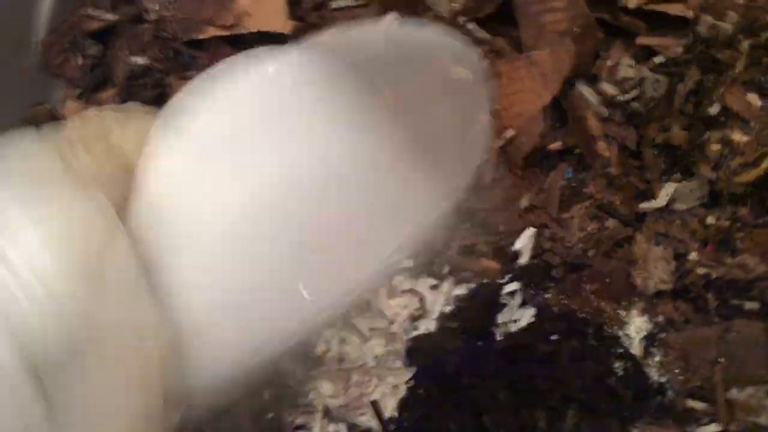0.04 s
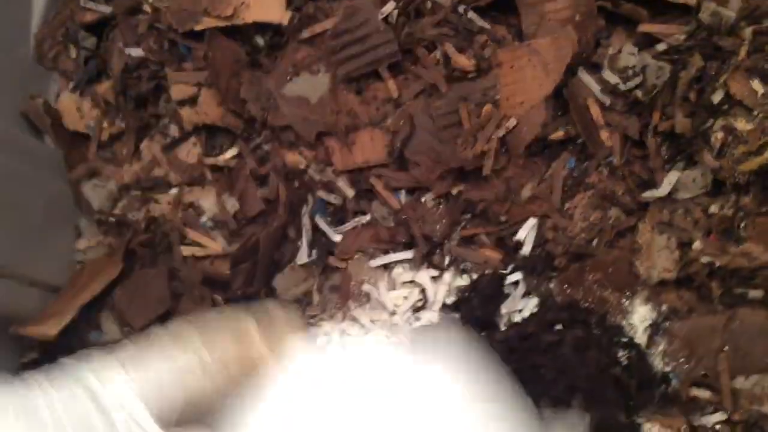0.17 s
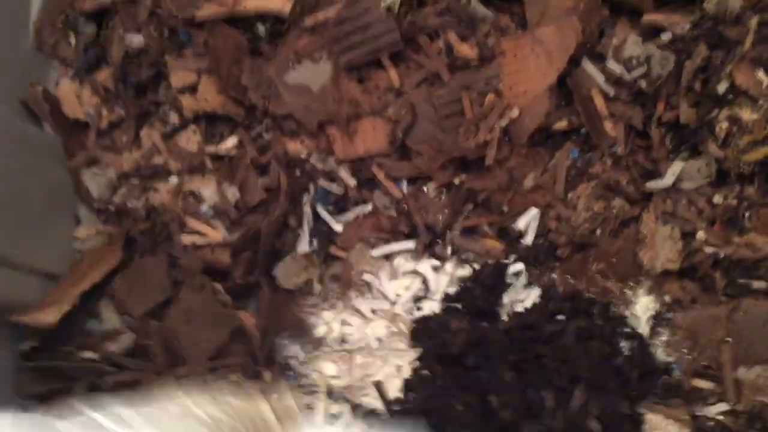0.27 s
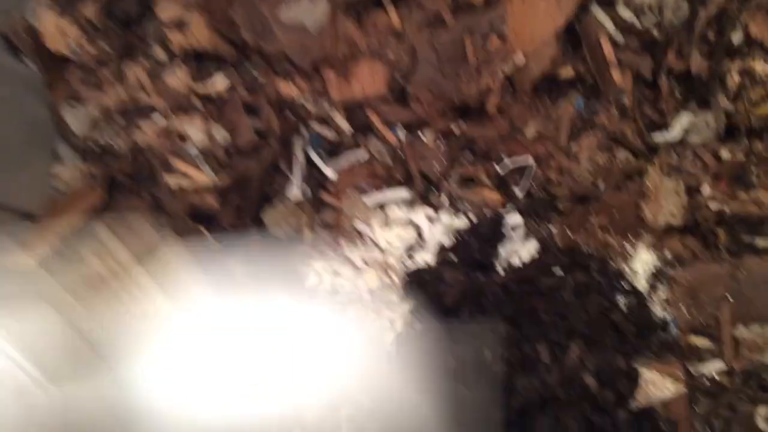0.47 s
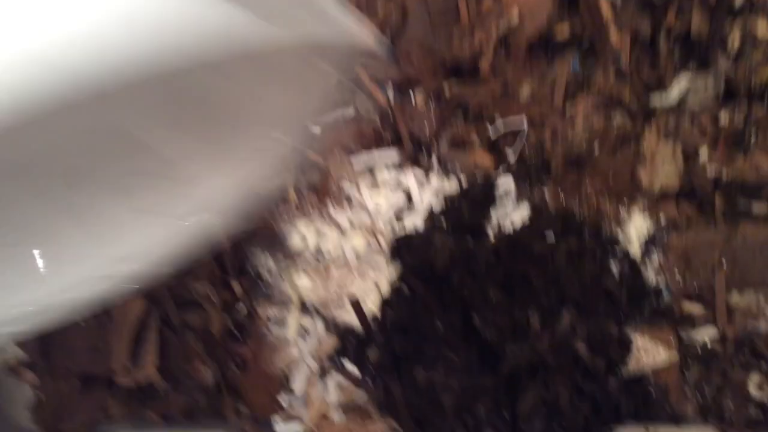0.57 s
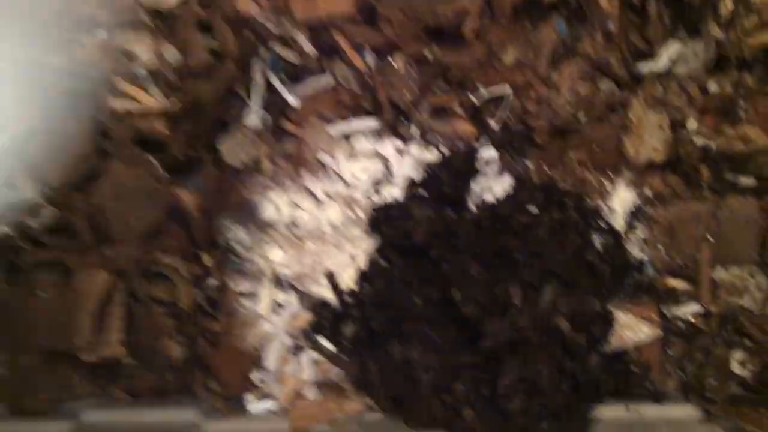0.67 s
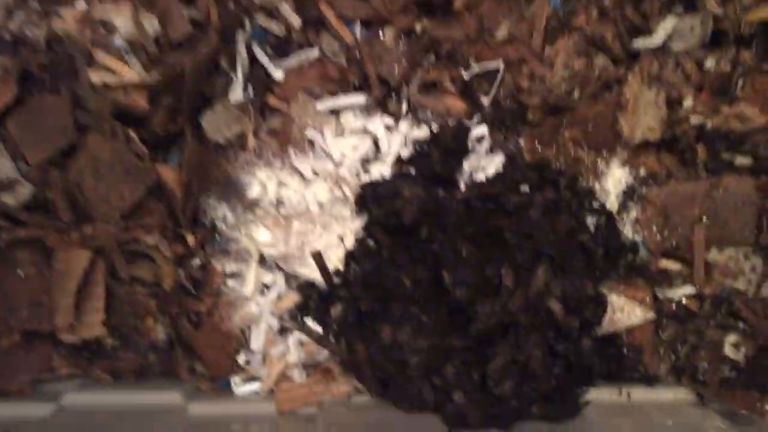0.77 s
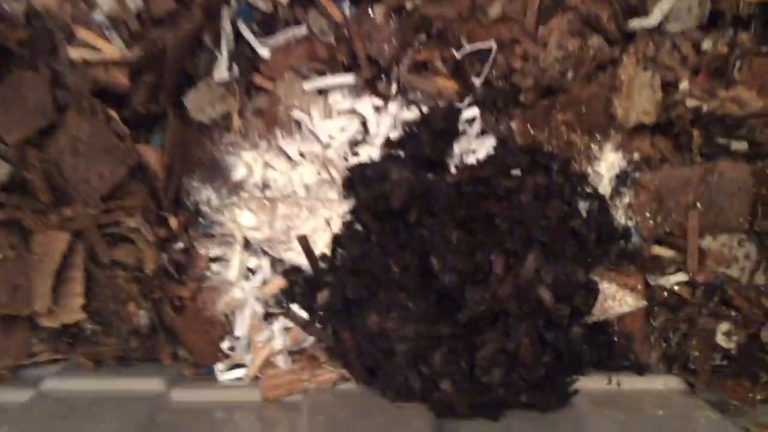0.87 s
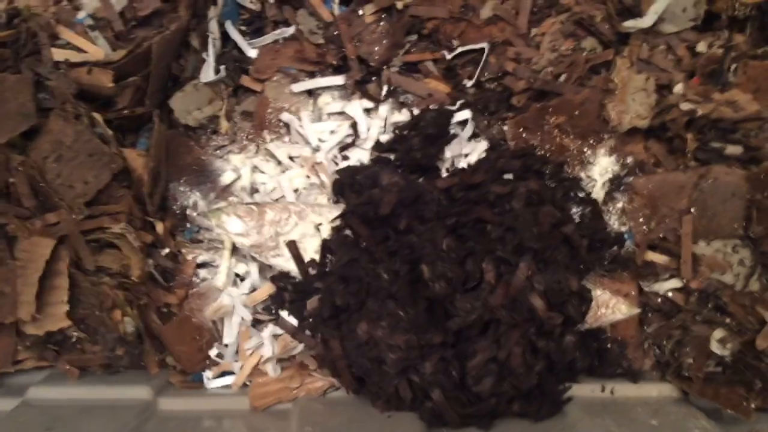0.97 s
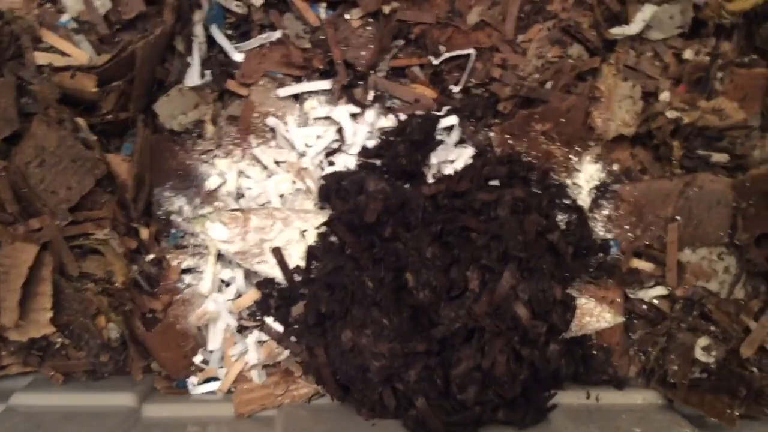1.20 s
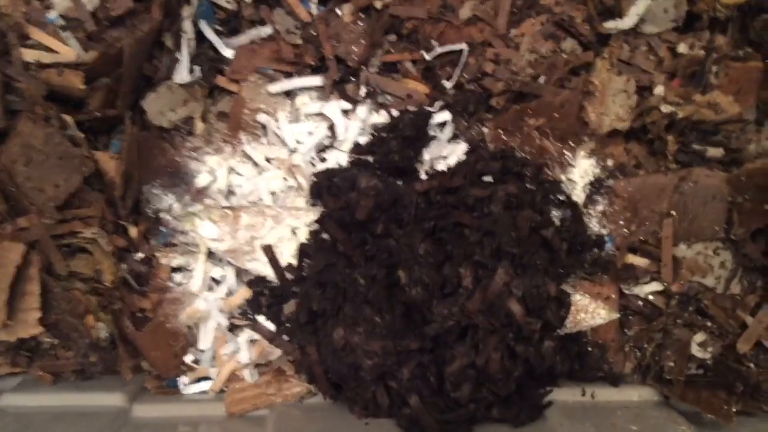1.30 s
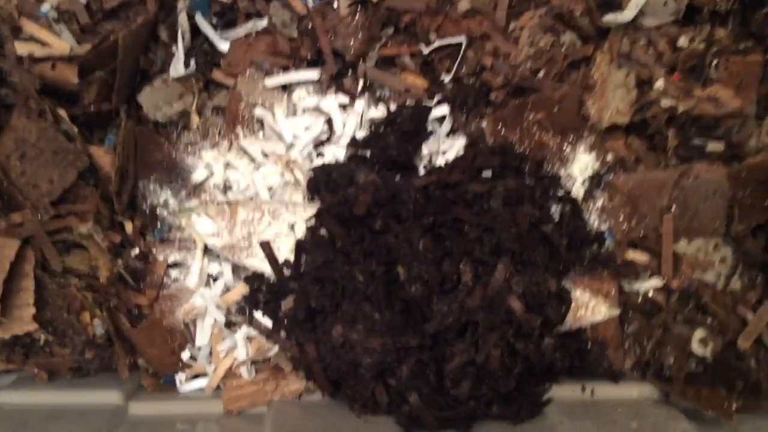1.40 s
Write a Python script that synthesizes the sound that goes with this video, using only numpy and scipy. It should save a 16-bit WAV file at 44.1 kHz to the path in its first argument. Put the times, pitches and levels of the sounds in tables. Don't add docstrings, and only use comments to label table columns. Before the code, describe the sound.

A stiff plastic bowl bangs three times against a hollow bin, then is put down with a bounce

```python
import sys
import numpy as np
from scipy import signal
from scipy.fft import rfft, irfft
from scipy.io import wavfile
from scipy.ndimage import uniform_filter1d

SR = 44100
rng = np.random.default_rng(int(sys.argv[2]) if len(sys.argv) > 2 else 0)


def pcm_store(signal):
    levels = np.round(np.clip(np.atleast_2d(signal), -1, 1) * 32767)
    wavfile.write(sys.argv[1], SR, levels.astype(np.int16).T)


def ratio(d):
    e = np.asarray(d, float) / 20
    return 10 ** e


N = 63945
T = np.arange(N) / SR

# f/Hz, density level/dB
HUSH_SPECTRUM = [(15, -41.5), (25, -14.5), (146, -6.5), (231, -17.5), (720, -25), (970, -24), (1710, -30.5),
                 (9200, -34), (16200, -49.5)]
# t/s, length/s, level/dB, centre f/Hz
RUBS = [(0.0982, 0.02, -55, 6000), (0.116, 0.041, -58, 4100), (0.133, 0.012, -53, 6000),
        (0.179, 0.014, -53, 5750), (0.32, 0.14, -56.5, 4070), (.69, 0.1, -60.5, 8060),
        (0.793, .014, -59, 3500), (.820, 0.015, -51.5, 8450), (0.807, 0.025, -54.5, 3670),
        (0.834, 0.12, -70.5, 5950), (1.232, 0.054, -58, 11000)]
# f/Hz, t60/s, level/dB
ROOM_BANDS = [(129.6, 0.28, -18.5), (294, 0.33, -18.5), (696, 0.44, -20), (1530, .4, -17.5),
              (3500, 0.32, -15.5), (7340, 0.37, -18), (11000, .2, -17.5)]
# end t/s, length/s, low tone level/dB, hiss level/dB
LEADS = [
    (0.2095, .022, -10, -22),
    (0.371, 0.036, -42.5, -42),
    (0.505, 0.026, -29.5, -39.5),
    (1.098, 0.0078, -35, -45),
]
# t/s, crack level/dB, blow level/dB, contact/ms, crack tilt/(dB per octave)
BLOWS = [
    (0.2047, -6.5, 0, 1.6, 0.7),
    (0.2124, -15.5, -12.5, 3.3, -6),
    (.3660, -16.5, -1, 1.37, -1.25),
    (.5030, -12.5, -.5, 1.7, -1.7),
    (0.5182, -25.5, -23, 0.89, -0.9),
]
BLOW_SPOT = [0, 0, 1, 2, 2]
# f/Hz, density level/dB
CRACK_SPECTRUM = [(500, -24.5), (1100, -8.5), (2180, -6.5), (2680, -8), (5340, -4), (6480, -7),
                  (12200, -10.5), (16200, -20.5)]
# f/Hz, width/Hz, level/dB at the first, second and third spot
SHELL_MODES = [(1390, 82, -14, 7, -1), (2056, 310, 7, -19, -7), (3400, 160, -3, 8, 13.5),
               (4140, 320, 4.5, -3, -17), (5290, 2100, -3, -4, -18.5), (7835, 500, -5, 9.5, 5.5),
               (9440, 600, -7, 13.5, -5.5)]
# f/Hz, t60/s, level/dB at the first, second and third spot
WALL_MODES = [(57.4, .2, -24, -22.5, -19), (92.4, 0.16, -2.5, -7, -7.5), (116.6, 0.13, -9, -14.5, -19),
              (132.34, 0.37, -22, -24.5, -18.5), (157.4, 0.15, -6.5, -15, -9),
              (164.1, 0.34, -9.5, -21.5, -14.5), (192.5, .22, -17.5, -33, -10.5),
              (222.2, 0.1, -7, -9.5, -9.5), (276.7, 0.12, -7, -11.5, -7), (352.5, .06, -12.5, -19, -18.5),
              (471.8, 0.17, -12.5, -34.5, -19), (729, 0.072, -11.5, -22, -26.5)]
WALL_SIGN = [-1, 1, 1, 1, 1, 1, 1, -1, 1, -1, 1, -1]
# f/Hz, t60/s, level/dB at the first, second and third spot
CLONK_MODES = [(849.3, 0.098, -4.5, 0, 0), (831.7, 0.17, -20.5, -10.5, -6.5), (855, .055, -13, -5.5, -11),
               (852, .35, -36.5, -25.5, -26.5), (1200, 0.033, -21, -5, -28)]
# t/s, f/Hz, level/dB, t60/s
TOUCHES = [
    (.5035, 3150, -20, .045),
    (.5190, 5500, -30, .02),
    (.8190, 3110, -58, .06),
    (.2065, 4180, -16, .035),
]
# t/s, crack level/dB, thump level/dB, contact/ms, crack tilt/(dB per octave)
LANDINGS = [
    (1.1012, -26, -47, 6.3, 0.8),
    (1.103, -26.5, -8.5, 1.9, 1.7),
    (1.1250, -40, -21.5, 1.7, -10.5),
    (1.1458, -27, -24.5, 2.1, 2),
    (1.168, -38, -21, 0.75, 1.5),
    (1.182, -43.5, -33, 0.7, 0),
]
# f/Hz, density level/dB
CLATTER_SPECTRUM = [(290, -30), (500, -4), (650, -2), (1180, 3.5), (1650, -11.5), (3470, -12.5),
                    (6210, -14.5), (9480, -17.5), (16200, -37)]
# f/Hz, level/dB, t60/s
TOP_MODES = [(79.7, -27, 0.34), (127.6, -21, 0.17), (175.3, -6.5, 0.18), (193, -2.5, 0.064),
             (227.5, -11.5, 0.11), (306.4, -26, 0.37), (395.4, -8.5, 0.075), (465.4, -18.5, 0.27),
             (595, -19, 0.067), (750, -15.5, 0.19), (842, -10, .2)]
TOP_SIGN = [-1, 1, 1, 1, -1, 1, -1, 1, -1, 1, -1]
# f/Hz, width/Hz, level/dB
BOWL_MODES = [(1185, 25, 0.5), (1217, 44, 9.5), (2393, 28.6, 21), (3166, 65, 15), (3430, 77, 20),
              (4060, 75, 15), (4426, 77, 17), (8220, 670, 5)]


def unit(x):
    return x / np.sqrt(np.mean(x ** 2))


def noise():
    return rng.standard_normal(N)


def shaped(x, points, tilt_db=0.):
    f = np.maximum(np.fft.rfftfreq(len(x), 1 / SR), 10)
    hz, db = np.array(points).T
    gain_db = np.interp(np.log(f), np.log(hz), db) + tilt_db * np.log2(f / 4000)
    return irfft(rfft(x) * ratio(gain_db), len(x))


def band(x, hz, width):
    return signal.lfilter(*signal.iirpeak(min(hz, .45 * SR), hz / width, fs=SR), x)


def band_twice(x, hz, width):
    return unit(band(band(x, hz, width), hz, width))


def ring(x, hz, t60):
    pole = np.exp(2j * np.pi * hz / SR - np.log(1000) / (t60 * SR))
    return signal.lfilter([1], [1, -pole], x).imag


def decay(at, t60):
    u = np.maximum(T - at, 0)
    return (1 - np.exp(-u / 0.00065)) * ratio(-60 * u / t60)


def push(at, ms):
    u = np.maximum(T - at, 0) / (ms / 4000)
    force = u * np.exp(-u)
    return force / force.sum()


def floor():
    hush = ratio(-60) * unit(shaped(noise(), HUSH_SPECTRUM))
    rumble_db = 5 * np.clip(1 - T / .9, 0, 1)
    return hush + band(hush, 112, 130) * (ratio(rumble_db) - 1)


def rustles():
    grains_per_s, spread_db = 2500, 3.5
    chance = rng.random((3, N))
    happens = chance[0] < grains_per_s / SR
    size = ratio(-spread_db * np.log(chance[1] + 1e-9))
    grains = unit(happens * size * np.sign(chance[2] - .5)) + .6 * noise()
    out = 0
    for at, length, db, hz in RUBS:
        swell = np.sin(np.pi * np.clip((T - at) / length, 0, 1) ** .6) ** 0.62
        out = out + ratio(db) * swell * band_twice(grains, hz, 1.2 * hz)
    return out


def room(x):
    gap_s, diffuse_hz, blur_share, air_hz = 0.006, 1000, 0.82, 11500
    u = np.maximum(T[:SR // 2] - gap_s, 0)
    echoes, hiss = 0, 0
    for hz, t60, db in ROOM_BANDS:
        air = band_twice(noise(), hz, hz)
        fade = (u > 0) * ratio(-60 * u / t60)
        fade = ratio(db) * 0.42 * fade / np.sqrt(np.sum(fade ** 2))
        blur = blur_share * (hz > diffuse_hz)
        echoes = echoes + air[-len(u):] * fade * np.sqrt(1 - blur)
        stored = np.abs(signal.fftconvolve(band(x, hz, hz) ** 2, fade ** 2)[:N])
        hiss = hiss + air * np.sqrt(blur * stored) * 1.5
    air_loss = signal.butter(3, air_hz, fs=SR, output="sos")
    return signal.sosfilt(air_loss, signal.fftconvolve(x, echoes)[:N] + hiss)


def lead_ins():
    low_tone = band_twice(noise(), 204, 200)
    hiss = unit(shaped(noise(), CRACK_SPECTRUM))
    out = 0
    for at, length, low_db, hiss_db in LEADS:
        leading = (T > at - length) * (T < at)
        swell = ratio(37 * np.minimum(T - at, 0) / length)
        out = out + (ratio(low_db) * low_tone + ratio(hiss_db) * hiss) * leading * swell
    return out


def crack(at, db, tilt_db, colour):
    tick_db, tick_t60, burst_t60, rattle_db, rattle_t60 = 2, 0.0058, 0.026, -13, 0.054
    grit = ratio(2.9 * 3.9 * uniform_filter1d(noise(), size=30))
    burst = unit(shaped(noise(), colour, tilt_db))
    tick = unit(shaped(noise(), colour, tilt_db + 4)) * ratio(tick_db) * decay(at, tick_t60)
    rattle = ratio(rattle_db) * grit * decay(at, rattle_t60)
    return ratio(db) * (tick + burst * (decay(at, burst_t60) + rattle))


def knocks():
    boom_lag_s, clonk_ms = 0.0022, 0.59
    out = 0
    for (at, crack_db, blow_db, ms, tilt), spot in zip(BLOWS, BLOW_SPOT):
        splat = crack(at, crack_db, tilt, CRACK_SPECTRUM)
        out = out + splat
        for hz, width, *db in SHELL_MODES:
            out = out + ratio(db[spot]) * band(splat, hz, width)
        rim_force = push(at, clonk_ms)
        for hz, t60, *db in CLONK_MODES:
            out = out + ratio(crack_db + db[spot]) * ring(rim_force, hz, t60)
        wall_force = push(at + boom_lag_s, ms)
        for (hz, t60, *db), sign in zip(WALL_MODES, WALL_SIGN):
            out = out + ratio(blow_db + db[spot]) * sign * ring(wall_force, hz, t60)
    return out


def pings():
    out = 0
    for at, hz, db, t60 in TOUCHES:
        touch = 1. * (np.arange(N) == int(at * SR))
        out = out + ratio(db) * ring(touch, hz, t60)
    return out


def set_down():
    chatter = unit(shaped(noise(), CLATTER_SPECTRUM))
    chatter = chatter * ratio(2.6 * unit(uniform_filter1d(noise(), size=90)))
    cracks = sum(crack(at, db, tilt, CLATTER_SPECTRUM) for at, db, _, _, tilt in LANDINGS)
    cracks = cracks + ratio(-36.5) * chatter * decay(LANDINGS[0][0], 0.4)
    force = sum(ratio(db) * push(at, ms) for at, _, db, ms, _ in LANDINGS)
    out = cracks
    for (hz, db, t60), sign in zip(TOP_MODES, TOP_SIGN):
        out = out + ratio(db) * sign * ring(force, hz, t60)
    for hz, width, db in BOWL_MODES:
        out = out + ratio(db) * band(cracks, hz, width)
    return out


def scene():
    near = knocks() + lead_ins() + rustles() + pings()
    far = set_down()
    return (near + room(near) + far + ratio(7) * room(far) + floor())[None]


def low_pass(x):
    return signal.sosfilt(signal.butter(12, 16400, fs=SR, output="sos"), x)


def record(dry):
    bass_cut = signal.butter(3, 50, "high", fs=SR, output="sos")
    treble_cut = signal.ellip(8, .2, 60, 15900, fs=SR, output="sos")
    mic = signal.sosfilt(bass_cut, dry)
    limited = signal.sosfilt(treble_cut, np.clip(mic, -1, 1))
    return low_pass(np.clip(limited, -1, 1))


dry = scene()
out = record(dry)
pcm_store(out)
```